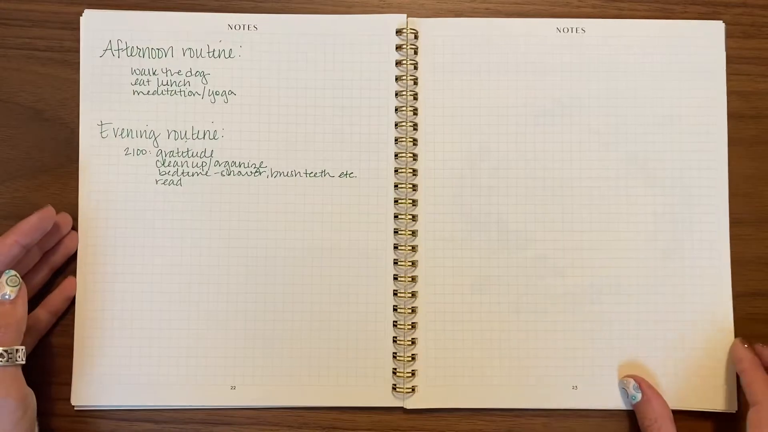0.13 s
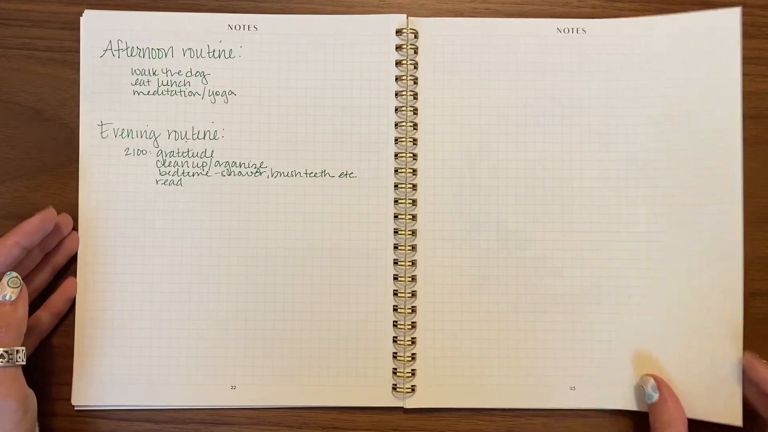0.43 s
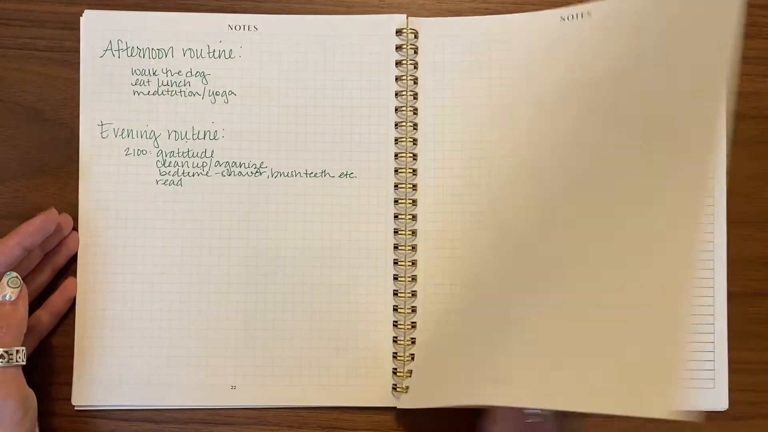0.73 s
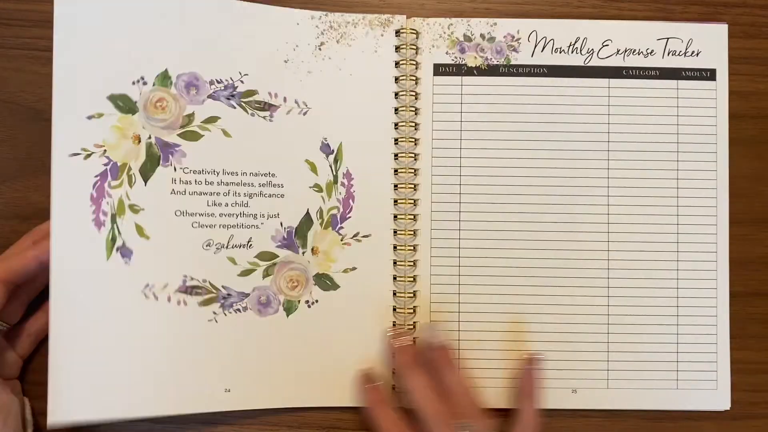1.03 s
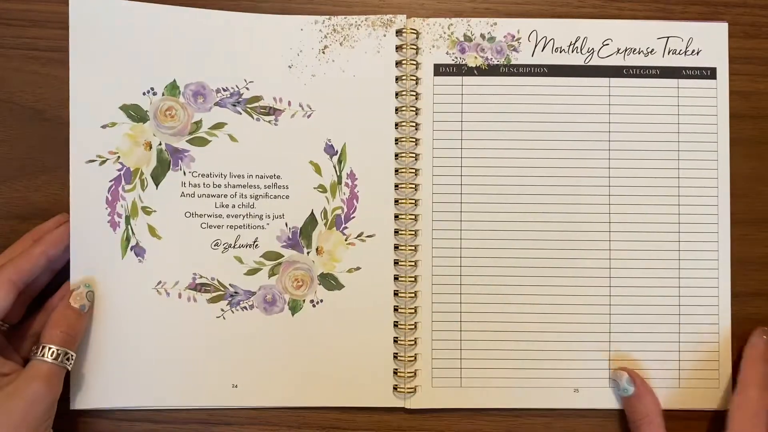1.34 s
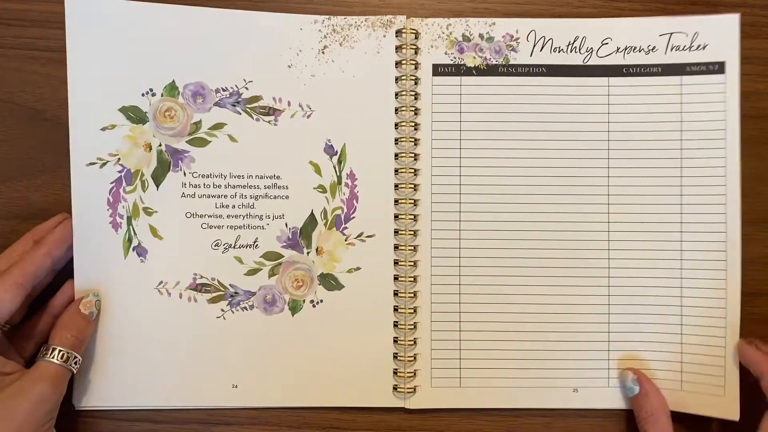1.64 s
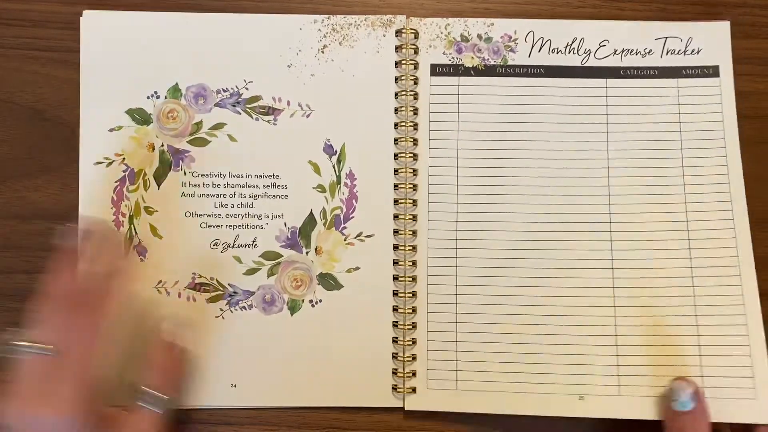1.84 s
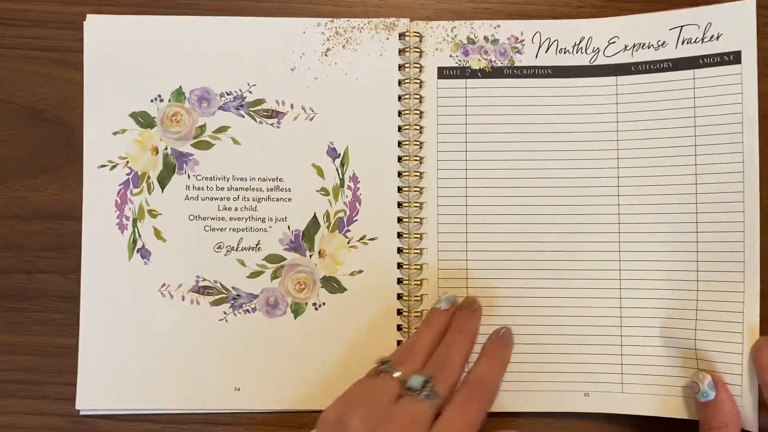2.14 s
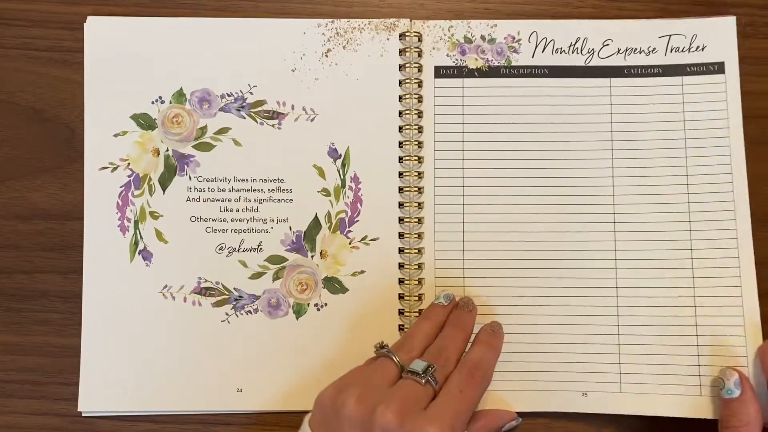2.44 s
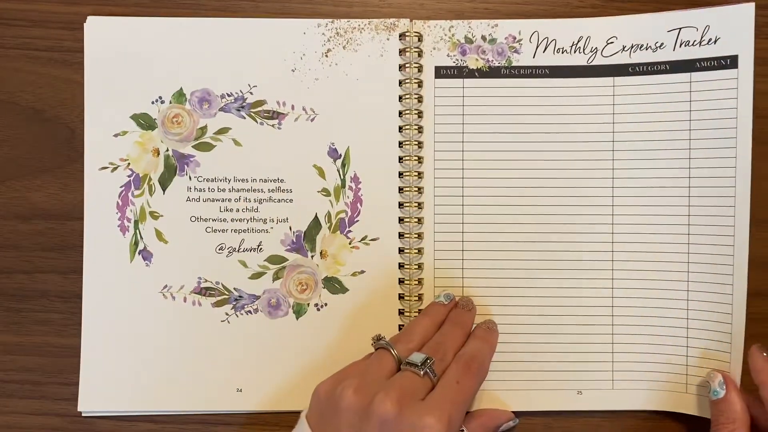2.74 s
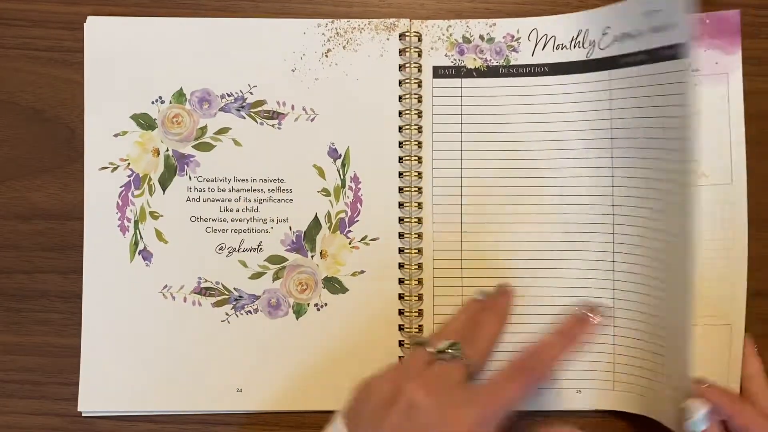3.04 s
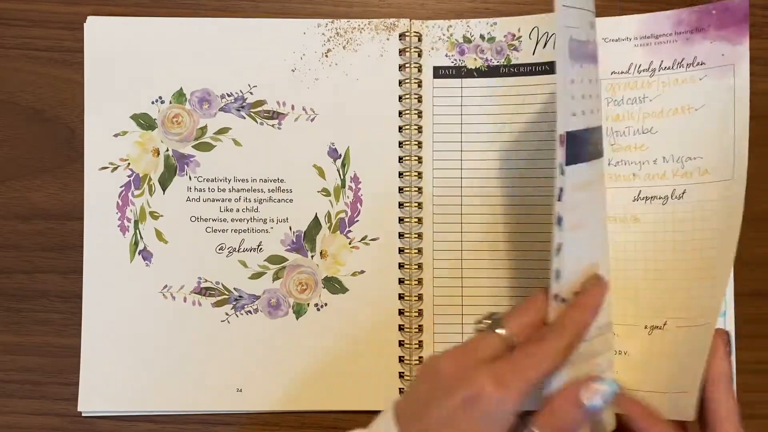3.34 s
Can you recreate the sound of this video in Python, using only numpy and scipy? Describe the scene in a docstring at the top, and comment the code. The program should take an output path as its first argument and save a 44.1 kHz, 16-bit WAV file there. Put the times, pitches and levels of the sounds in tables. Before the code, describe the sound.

Stiff notebook pages are turned by hand, close in stereo, in a small room with faint low hum. Scuffs and hollow paper flops come at 0.4-0.65 s; a page flutters over from 0.7 s, snapping at 1.04 s. Dry finger strokes follow, with soft table bumps near 1.6 and 1.8 s and a brief squeak at 1.86 s. Sharp snaps crackle from 2.86 s, loudest at 3.15 s, then a flop and fading rustle.

```python
"""A small, quietly humming room: two stiff planner pages are turned by hand on a wooden table, close-miked in stereo.
It opens on scuffs, strokes of fine grainy friction and hollow flops and knocks of the loose sheet.
From 0.7 s the first page flutters over in the air, and at 1.04 s it buckles with a snap of ringing paper.
More strokes follow, with soft bumps through the table and one narrow squeak at 1.86 s.
From 2.86 s further snaps crackle, the loudest at 3.15 s; a short diffuse tail answers all the paper."""
import sys
import numpy as np
from scipy import signal
from scipy.fft import rfft, irfft, next_fast_len
from scipy.io import wavfile
from scipy.ndimage import uniform_filter1d, map_coordinates

SR = 44100
rng = np.random.default_rng(int(sys.argv[2]) if len(sys.argv) > 2 else 0)


def waveform_to_disk(signal):
    """Save audio, clipped to [-1, 1], as 16-bit WAV at the path in sys.argv[1]."""
    frames = np.transpose(np.atleast_2d(signal))
    scaled = np.clip(frames, -1, 1) * 32767
    samples = np.round(scaled).astype(np.int16)
    wavfile.write(sys.argv[1], SR, samples)


N = 154350  # 3.5 s
TIME = np.arange(N) / SR

# Levels are those of the dry sources, ahead of slow wander, room and microphone.
# Rise is the time constant of an exponential; decay is the time to fall 60 dB.

# Room hum spectrum: [f/Hz, level/dB per Hz]
HUM_TONE = [(24, -36), (43, -1), (55, -2), (100, -4.5), (160, 2.5), (250, -3), (400, -5), (600, -12.5),
            (1200, -19), (1800, -32.5), (4000, -43), (16000, -49.5)]
# Steady-pitched fan tones: [f/Hz, level/dB]
HUM_LINES = [(44, -63.5), (125, -63), (194, -61.5), (240, -57), (311, -63)]
# Left-right likeness of hum and thuds: [f/Hz, correlation]
HUM_ALIKE = [(60, 0.968), (250, 0.96), (600, 0.12), (2000, 0.1), (8000, 0.07)]
HUM_DB = -49.5

# Decay time of the small room: [f/Hz, T60/s]
ROOM_T60 = [(200, 0.36), (1200, 0.14), (4000, 0.1925), (12000, 0.107)]
# Left-right likeness of the room's tail: [f/Hz, correlation]
ROOM_ALIKE = [(200, 0.95), (1500, 0.58), (5000, 0.058)]
ROOM_DB, ROOM_DELAY_S = -11.5, 0.005

# Hands press the book against the table: [t/s, level/dB]
THUDS = [(.64, -43), (1.57, -43), (1.82, -45.5)]
# Thud spectrum: [f/Hz, level/dB per Hz]
THUD_TONE = [(30, -18), (90, -21), (125, 18), (175, -12), (300, -27), (1000, -60)]

# First page swinging over and settling: [t/s, level/dB]
SWING = [(.70, -63), (.80, -70), (.835, -46), (.87, -40.5), (.93, -42.5), (.955, -48), (.985, -75)]
# Spectrum of the swinging page: [f/Hz, level/dB per Hz]
SWING_TONE = [(50, -17.5), (125, 8.5), (220, -10.5), (600, 4), (1000, -6), (1500, -11), (2500, -36.5),
              (5000, -43), (16000, -31.5)]

# Left-right likeness of the close paper: [f/Hz, correlation]
PAPER_ALIKE = [(100, 1), (600, 0.85), (1200, 0.98), (3000, 0.63), (6000, 0.28), (10000, 0.33),
               (15000, -0.69)]

# Scuffs and ticks of nails, page edges and wire binding:
# [t/s, level/dB, brightness/dB per octave, rise/s, decay/s]
SCUFFS = [(.126, -44.5, 5, 0.00085, 0.026), (0.352, -42.5, 0, 0.00243, 0.038),
          (0.39, -39.5, 1.5, 0.00076, 0.072), (0.404, -35, -2.5, 0.0038, 0.051),
          (0.6234, -35.5, -0.5, 0.00049, 0.0163), (0.8124, -34.5, -2, 0.00035, 0.028),
          (.911, -37, -3, 0.00049, 0.015), (1.018, -43.5, -3, .0005, 0.0147),
          (1.137, -42, 2, 0.00122, 0.0218), (1.389, -44, 9, 0.0011, 0.041),
          (1.679, -43.5, 1.5, 0.023, 0.18), (2.21, -46.5, 1.5, 0.0065, 0.12),
          (2.29, -36, -0.5, 0.0003, 0.01), (2.526, -46.5, 2, 0.0049, 0.19), (2.961, -33, 1, 0.0035, 0.018)]
# Scuff spectrum before the brightness tilt: [f/Hz, level/dB per Hz]
SCUFF_TONE = [(200, -54), (1000, 7), (2200, -0.5), (3500, -4.5), (5000, 4.5), (6300, -5), (9000, -6.5),
              (11000, -2), (16000, -14)]
# A fingertip catches the page edge: (level/dB, rise/s, decay/s)
SQUEAK = (-38.5, 0.0038, 0.034)
# Squeak spectrum: [f/Hz, level/dB per Hz]
SQUEAK_TONE = [(1000, -37), (3300, -18.5), (4400, 4), (5200, 8), (6500, -38), (16000, -42)]
SQUEAK_AT_S = 1.858

# Strokes of fingers and sheets over paper: [start t/s, end t/s, hiss of fingers and edges level/dB,
# sweep of the sheet's face level/dB, extra sizzle in the hiss/dB, fade/s per 20 dB (sign ignored)]
STROKES = [(0.342, 0.465, -51.5, -58, 1, 0.43), (0.533, 0.686, -54.5, -59, 3, 0.56),
           (0.736, 0.968, -54.5, -50, 4, 0), (1.018, 1.08, -55.5, -69, -1.5, 0.43),
           (1.165, 1.225, -48.5, -57.5, 4.5, 0.16), (1.297, 1.40, -62.5, -67, 0.5, 0.25),
           (1.596, 1.767, -52, -58.5, 1, 0.55), (1.858, 1.933, -47.5, -58, -1.5, 0.14),
           (1.996, 2.214, -51.5, -51.5, -4.5, -0.03), (2.299, 2.371, -54, -54.5, 6, 0),
           (2.385, 2.697, -63.5, -63.5, 0, -6.5), (2.709, 2.727, -47, -55, -6.5, 0.5),
           (2.754, 2.897, -45, -49, -3, 0.02), (2.89, 3.153, -50.5, -52, 1.5, -1),
           (3.157, 3.248, -50, -45.5, 0, 0.1724), (3.36, 3.503, -63, -54.5, -26, -3)]
# Spectrum of fingers and edges: [f/Hz, level/dB per Hz]
SLIDE_TONE = [(300, -32), (1000, -9), (2700, -14), (3600, -4.5), (4700, -3), (5200, 5.5), (5600, 0.5),
              (6300, -6.5), (8500, -12.5), (10400, -6), (12500, -8), (15500, -8.5)]
# Spectrum of the sheet's face: [f/Hz, level/dB per Hz]
SWEEP_TONE = [(200, 2), (550, -7), (1000, -1.5), (1500, -1.5), (2150, 0.5), (3200, -2.8), (4500, -10),
              (8000, -17.5), (16000, -17)]
STROKE_RISE_S = 0.032  # time to gain 20 dB as contact begins
SIZZLE_HZ = 7500  # the hiss counts as sizzle above this

# The sheet bellies out and crumples: [t/s, level/dB, pitch f/Hz, rise/s, decay/s]
FLOPS = [(0.412, -36, 1113, 0.0067, 0.067), (.56, -48, 695, 0.018, 0.19), (0.637, -31.5, 880, 0.004, 0.067),
         (.829, -37.5, 1400, 0.0022, 0.033), (0.886, -39.5, 1265, 0.0084, 0.16),
         (0.927, -31.5, 1070, 0.0044, 0.064), (1.049, -34, 960, 0.011, 0.094),
         (1.683, -36, 1200, 0.0082, 0.078), (2.531, -37.5, 1030, 0.0049, .06),
         (2.936, -32, 1290, 0.0019, 0.06), (3.295, -28.5, 1100, 0.0041, 0.059)]
# Flop spectrum: [multiple of the pitch, level/dB]
FLOP_TONE = [(.08, -0.5), (.15, -9), (.3, -2.5), (.5, -3), (.8, 0), (1.2, -2.5), (1.7, -6), (2.6, -19),
             (6, -31.5), (16, -25)]

# The slack sheet pops over with a hollow knock: [t/s, peak level/dB, pitch f/Hz]
KNOCKS = [(0.4098, -33, 1380), (.416, -30, 993), (.629, -29, 870), (.638, -24, 886), (0.883, -36, 990),
          (.925, -22.5, 954), (1.0423, -26, 2420), (1.0463, -26.5, 1230), (1.05, -28, 700),
          (1.679, -26.5, 1172), (1.698, -29, 1160), (2.53, -31.5, 1130), (2.8655, -17.5, 1810),
          (3.2515, -28.5, 1410), (3.272, -29.5, 840), (3.295, -23.5, 1540)]
KNOCK_OCTAVES = 0.43  # half width of a knock's band
KNOCK_LAG_S = 0.002997  # lag of the bending wave at its pitch

# The sheet buckles: [t/s, level/dB, brightness/dB per octave, pitch ratio of the sheet's resonances,
# lag of the bending wave at 1 kHz/s]
SNAPS = [(1.0409, -29.5, 1, 1.23, .0028), (2.864, -22.5, 1.2, 1.0166, .0016),
         (2.934, -31.5, 3.5, 1.23, .004), (3.1472, -12.6, -0.32, 0.99, .0018),
         (3.2843, -30, -1.5, 1.115, 0.005)]
# Resonances of the taut sheet, before the pitch ratio: [f/Hz, width/Hz, level/dB]
SHEET = [(1080, 130, 4), (1560, 100, -2), (1880, 260, 2), (2400, 400, -11), (2860, 160, -11),
         (3860, 250, -3.5), (5220, 300, -.5), (6090, 240, -2.5), (9800, 1800, -17)]
# Creases giving way after a snap: [f/Hz, level/dB per Hz]
CRACKLE_TONE = [(300, -6), (1900, -1.5), (3000, 0), (5600, -3), (8500, -7), (16000, -17)]
SNAP_LOW_HZ, SNAP_HIGH_HZ = 880, 9800  # the sheet radiates little outside these
SNAP_S = 0.0062  # length over which a snap's level counts
SNAP_LAG_S, SNAP_MAX_RAD = 0.00005, 1.6  # lead of the left channel; largest phase lead
CRACKLE_DB, CRACKLE_S = -13.5, 0.14  # level relative to the snap; decay

# Microphone response: [f/Hz, level/dB]
MICROPHONE = [(20, -2.5), (6400, 1), (7000, -17), (7550, -33), (8400, 0), (12400, -2), (13600, -25),
              (14700, -2), (16000, 0.5)]
TOP_HZ = 16000
PEAK_LIMIT, KNEE = 0.95, 4  # full-scale ceiling; sharpness of the rounding


def amp(db):
    """Decibels to gain."""
    return 10 ** (np.asarray(db) / 20)


def unit(x):
    """Scale to rms 1."""
    return x / np.sqrt(np.mean(x ** 2) + 1e-20)


def along(points, hz):
    """Read (f/Hz, value) points on a log frequency axis."""
    f, v = np.transpose(points)
    return np.interp(np.log(hz + 1e-3), np.log(f), v)


def level(rows):
    """Gain per sample from (t/s, level/dB) rows."""
    return amp(np.interp(TIME, *np.transpose(rows)))


def wobble(rate):
    """A smooth random curve, rate knots a second."""
    knots = rng.standard_normal(int(N * rate / SR) + 4)
    return map_coordinates(knots, [TIME * rate])


def filtered(x, response):
    """Apply a response of frequency to x."""
    m = next_fast_len(N + SR // 2)
    spectrum = rfft(x, m) * response(np.fft.rfftfreq(m, 1 / SR))
    return irfft(spectrum, m)[..., :N]


def spread(pair, alike):
    """Blend two unrelated signals into left and right with the given likeness."""
    def shares(hz):
        turn = np.arccos(np.clip(along(alike, hz), -1, 1)) / 2
        return np.array([np.cos(turn), np.sin(turn)])

    mid, side = filtered(pair, shares)
    return np.array([mid + side, mid - side])


def swell(s, rise, decay):
    """Exponential rise to time s, then 60 dB down in decay seconds."""
    after = TIME - s
    return np.exp(np.minimum(after / rise, -np.log(1000) * after / decay))


def friction(tone, rate, grain_share, alike=PAPER_ALIKE):
    """Stereo rustle of rms 1: fibres catching at random, rate a second, over smooth noise."""
    catches = unit((rng.random(N) < rate / SR) * rng.standard_normal((2, N)))
    smooth = rng.standard_normal((2, N))
    drive = np.sqrt(grain_share) * catches + np.sqrt(1 - grain_share) * smooth
    coloured = filtered(drive, lambda hz: amp(along(tone, hz)))
    return unit(spread(coloured, alike))


def burst(rustle, s, db, rise, decay):
    """A short piece of rustle whose swell peaks at the given time and level."""
    shape = swell(s, rise, decay)
    return amp(db) * np.sqrt(np.mean(shape ** 2)) * unit(shape * rustle)


def patchy(x, depth_db):
    """The colour drifts as the contact moves over the sheet."""
    z = signal.stft(x, nperseg=512)[2]
    field = rng.standard_normal(z.shape[1:])
    field = uniform_filter1d(field, size=5, axis=0)  # over frequency
    field = uniform_filter1d(field, size=9, axis=1)  # over time
    drifting = signal.istft(z * amp(depth_db * unit(field)), nperseg=512)[1]
    return unit(drifting[:, :N])


def hum():
    """Low room noise with a few fan tones, unsteady in level and phase."""
    noise = rng.standard_normal((2, N))
    air = unit(spread(filtered(noise, lambda hz: amp(along(HUM_TONE, hz))), HUM_ALIKE))
    tones = np.zeros(N)
    for hz, db in HUM_LINES:
        strength = amp(db) * np.sqrt(2) * amp(5.23 * wobble(5.9))
        tones += strength * np.sin(2 * np.pi * hz * TIME + 1.06 * wobble(8))
    return amp(HUM_DB) * air + tones


def room(x):
    """A short diffuse tail of decaying noise, different in each channel, its decay set by frequency."""
    hz, t, z = signal.stft(rng.standard_normal((2, SR // 2)), SR, nperseg=256)
    decay = np.exp(-np.log(1000) * t / along(ROOM_T60, hz)[:, None])
    tail = signal.istft(z * decay, SR, nperseg=256)[1]
    tail = tail / np.linalg.norm(tail[0])
    tail = np.pad(tail, ((0, 0), (round(ROOM_DELAY_S * SR), 0)))
    return spread(signal.fftconvolve(x, tail, axes=1)[:, :N], ROOM_ALIKE)


def thuds():
    """Soft low bumps through the table: low noise under slow swells of pressing force."""
    force = sum(amp(db) * swell(s, 0.043, 0.34) for s, db in THUDS)
    return force * friction(THUD_TONE, rate=180, grain_share=0.1, alike=HUM_ALIKE)


def swing():
    """Low flutter of the page in the air: friction noise with a quick random wobble."""
    airborne = (TIME > SWING[0][0]) & (TIME < SWING[-1][0])
    flutter = amp(1.3 * wobble(80.1))
    return airborne * level(SWING) * flutter * friction(SWING_TONE, rate=450, grain_share=0.55)


def scuffs():
    """Brief bursts of catching fibres, each with its own brightness, and one narrow squeak."""
    out = burst(friction(SQUEAK_TONE, rate=1800, grain_share=0.09), SQUEAK_AT_S, *SQUEAK)
    for s, db, tilt_db, rise, decay in SCUFFS:
        tone = [(hz, tone_db + tilt_db * np.log2(hz)) for hz, tone_db in SCUFF_TONE]
        out += burst(friction(tone, rate=3400, grain_share=0.4), s, db, rise, decay)
    return out


def sliding():
    """Each stroke starts quickly, holds and fades: hiss and sizzle of fingers, broader sweep of the sheet."""
    power = np.zeros((3, N))
    for start, end, hiss_db, sweep_db, sizzle_db, fade in STROKES:
        before = (start - TIME) / STROKE_RISE_S
        after = (TIME - end) / abs(fade)  # a fade of 0 stops at once
        contact = 10 ** -np.maximum(0, np.maximum(before, after))
        gains = amp([[hiss_db], [hiss_db + sizzle_db], [sweep_db]])
        power += (gains * contact) ** 2
    hiss, sizzle, sweep = np.sqrt(power)

    fingers = patchy(friction(SLIDE_TONE, rate=800, grain_share=0.35), depth_db=4.0)
    fine = filtered(fingers, lambda hz: hz > SIZZLE_HZ)
    face = patchy(friction(SWEEP_TONE, rate=550, grain_share=0.4), depth_db=3.0)

    pressure = amp(0.53 * wobble(27.97))
    sizzling = sizzle * amp(1.1 * wobble(21.83)) * fine
    sweeping = sweep * amp(2.0 * wobble(60)) * face
    return pressure * (hiss * (fingers - fine) + sizzling + sweeping)


def flops():
    """Hollow crumples of the loose sheet: friction bursts, each coloured around its own pitch."""
    out = np.zeros((2, N))
    for s, db, hz, rise, decay in FLOPS:
        tone = [(multiple * hz, tone_db) for multiple, tone_db in FLOP_TONE]
        out += burst(friction(tone, rate=2400, grain_share=0.519), s, db, rise, decay)
    return out


def knocks():
    """One bending wave crosses the sheet: a few cycles that fall in pitch, the treble arriving first."""
    out = np.zeros(N)
    for s, db, hz in KNOCKS:
        band = lambda f: np.exp(-0.5 * (np.log2((f + 1) / hz) / KNOCK_OCTAVES) ** 2)
        # The lag at the pitch itself is taken off, so that the pitch arrives at s.
        bend = lambda f: np.exp(-2j * np.pi * KNOCK_LAG_S * (2 * np.sqrt(hz * f) - f))
        wave = filtered(signal.unit_impulse(N, round(s * SR)), lambda f: band(f) * bend(f))
        out += amp(db) * wave / np.abs(wave).max()
    return out


def sheet_ring(f):
    """Resonances of the taut sheet: a sum of damped bandpass modes."""
    return sum(amp(db) * 1j * f * w / (c * c - f * f + 1j * f * w) for c, w, db in SHEET)


def sheet_radiation(f):
    """The sheet radiates weakly at low and very high frequency."""
    low_cut = f ** 2 / np.hypot(f ** 2, SNAP_LOW_HZ ** 2)
    return low_cut / np.hypot(1, (f / SNAP_HIGH_HZ) ** 2)


def snaps():
    """A buckle rings the sheet and leaves a papery crackle; treble crosses the paper faster, arriving first."""
    cracks, crackle = np.zeros(N), np.zeros((2, N))
    for s, db, tilt_db, pitch, lag in SNAPS:
        bend = lambda f: np.exp(-2j * np.pi * lag * 2 * np.sqrt(1000 * f))
        tilt = lambda f: amp(tilt_db * np.log2((f + 100) / 2000))
        response = lambda f: sheet_ring(f / pitch) * bend(f) * tilt(f) * sheet_radiation(f)
        crack = filtered(signal.unit_impulse(N, round(s * SR)), response)
        cracks += amp(db) * unit(crack) * np.sqrt(SNAP_S * SR / N)

        rustle = friction(CRACKLE_TONE, rate=900, grain_share=0.7)
        creases = filtered(rustle, lambda f: np.sqrt(np.abs(sheet_ring(f / pitch))))
        crackle += burst(creases, s + lag, db + CRACKLE_DB, 0.0002, CRACKLE_S)

    def left_leads(f):
        lead = np.minimum(2 * np.pi * f * SNAP_LAG_S, SNAP_MAX_RAD)
        return np.exp(0.5j * lead * np.array([[1], [-1]]))

    return crackle + filtered(cracks, left_leads)


def scene():
    """The close paper, its answer from the room, bumps through the table and the hum."""
    paper = swing() + scuffs() + sliding() + flops() + knocks() + snaps()
    return hum() + amp(ROOM_DB) * room(paper) + thuds() + paper


def record(dry):
    """The microphone has two treble notches, rounds off the highest peaks and has a band limit."""
    x = filtered(dry, lambda hz: amp(along(MICROPHONE, hz)))
    x = x / (1 + np.abs(x / PEAK_LIMIT) ** KNEE) ** (1 / KNEE)
    return filtered(x, lambda hz: hz < TOP_HZ)


dry = scene()
out = record(dry)
waveform_to_disk(out)
```